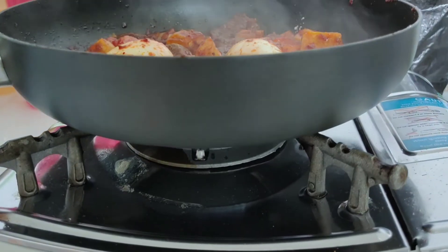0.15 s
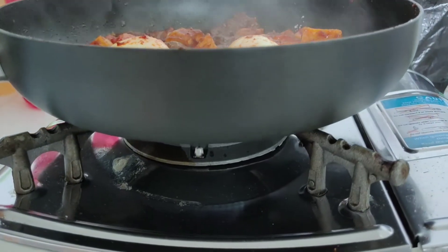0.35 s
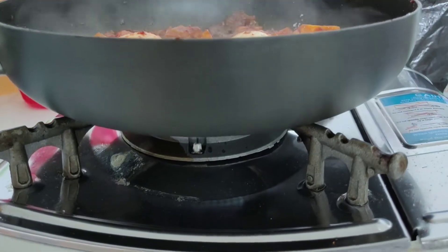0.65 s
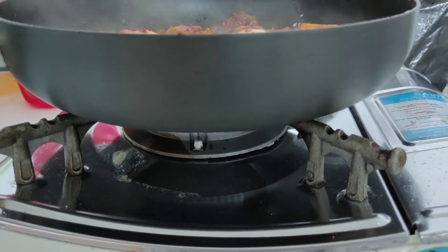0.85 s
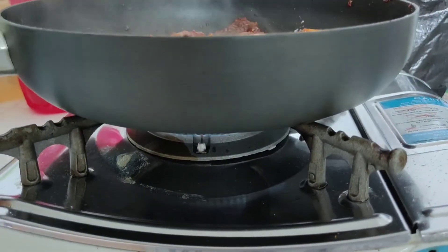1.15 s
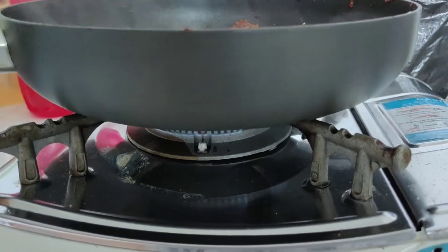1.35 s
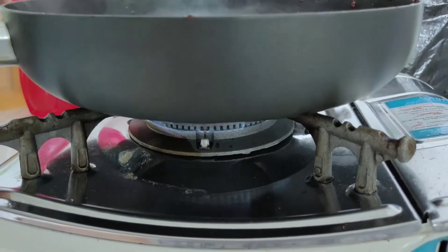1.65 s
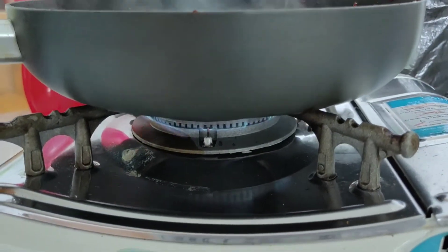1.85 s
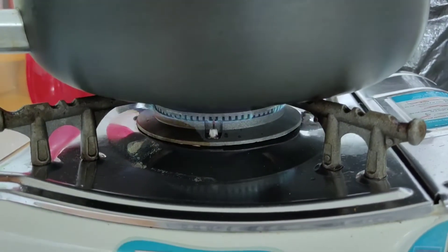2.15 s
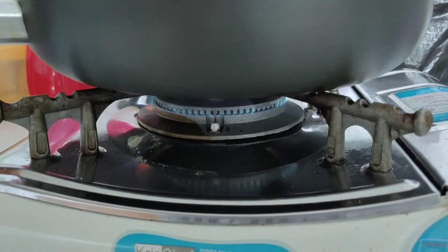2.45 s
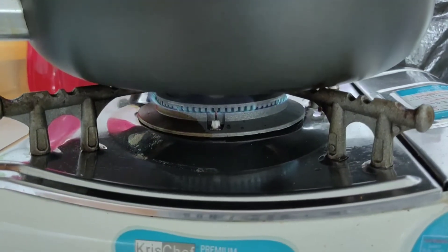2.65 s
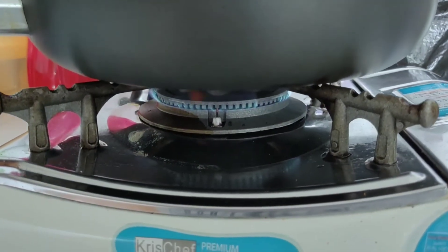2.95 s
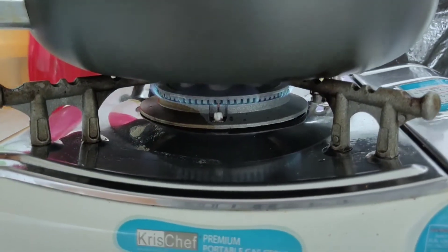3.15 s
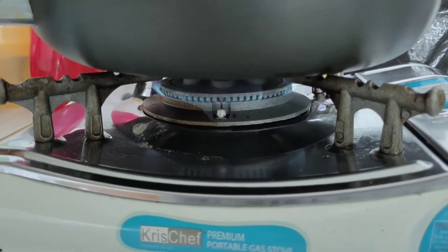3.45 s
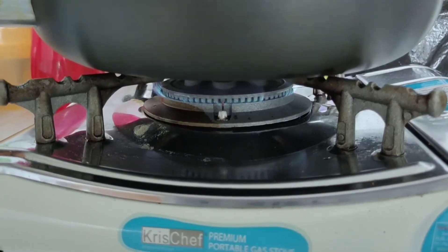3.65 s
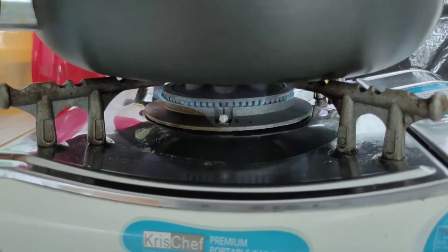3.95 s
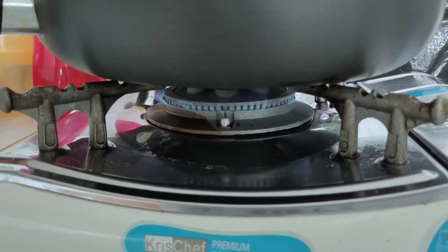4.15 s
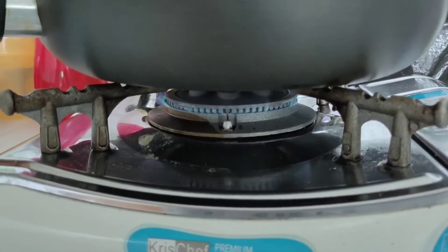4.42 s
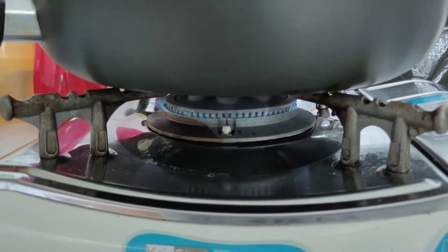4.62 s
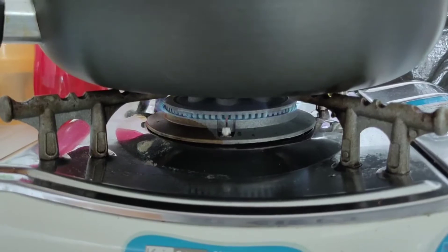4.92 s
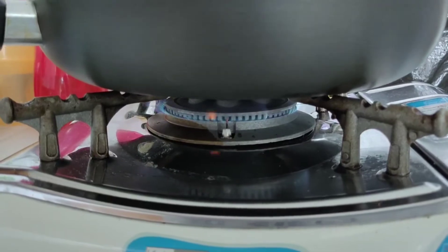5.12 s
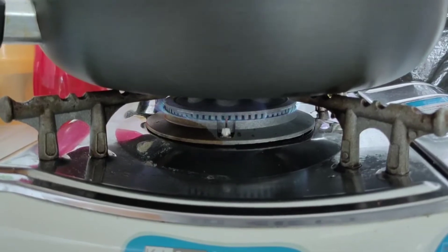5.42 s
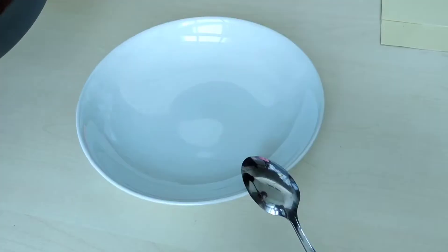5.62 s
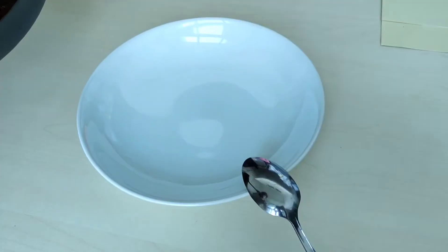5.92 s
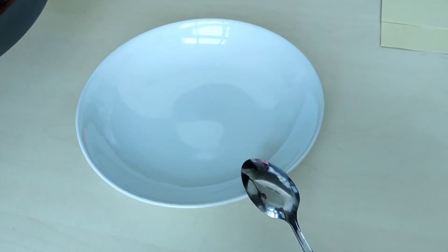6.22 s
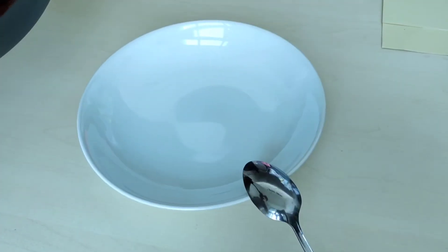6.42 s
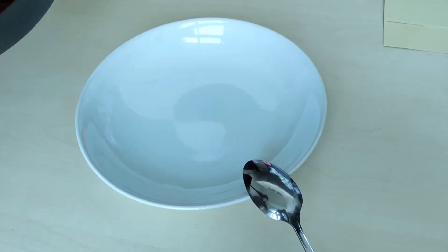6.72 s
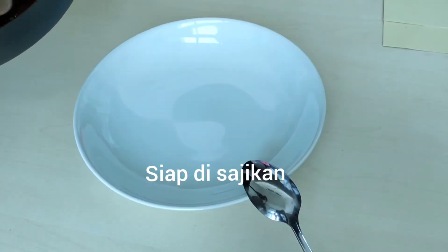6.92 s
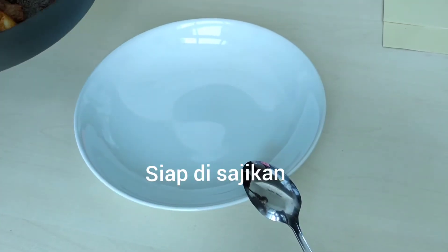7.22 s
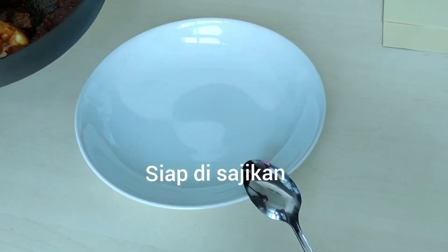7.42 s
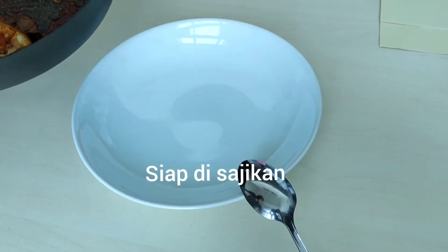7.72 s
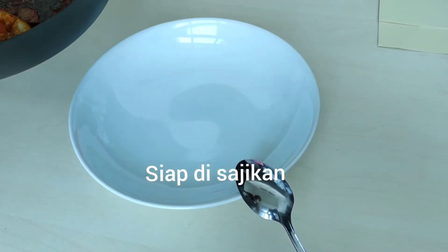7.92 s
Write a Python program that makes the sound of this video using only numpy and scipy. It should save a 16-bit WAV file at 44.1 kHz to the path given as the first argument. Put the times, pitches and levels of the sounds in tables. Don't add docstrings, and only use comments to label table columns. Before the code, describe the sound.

In a small kitchen, gas jets hiss brightly and evenly under a simmering pan, with fine crackle, occasional soft steam spits and a low rumbling extractor fan. It all cuts off suddenly into a brief silence. Then the room fades in quieter, with a more distant fan, and a hand shifts a pan and spoon: short metal scrapes, sleeve rustle, ringing ticks. Close stereo phone microphones.

```python
import sys
import numpy as np
from scipy import signal
from scipy.fft import rfft, irfft
from scipy.io import wavfile
from scipy.ndimage import uniform_filter1d

SR = 44100
rng = np.random.default_rng(int(sys.argv[2]) if len(sys.argv) > 2 else 0)


def linear_from_db(decibels):
    return 10 ** (np.asarray(decibels, float) / 20)


def digitize_waveform(pressure):
    field = np.atleast_2d(pressure).T
    bounded = np.clip(field, -1, 1)
    quanta = np.round(bounded * 32767).astype(np.int16)
    wavfile.write(sys.argv[1], SR, quanta)


N = 355887
TIME = np.arange(N) / SR
HZ = np.fft.rfftfreq(N + 513, 1 / SR) + 1
SIDES = np.array([[.5], [-.5]])
CUT_S, OPEN_S = 5.429, 5.62

# (frequency [Hz], likeness [0-1], left leads by [radians],
# left minus right [dB])
STOVE_MICS = [(60, 1, 0, 0), (130.6, 0.97, -0.17, -1), (220, 0.71, -0.15, -1.5), (348, 0.75, -0.0, -3),
              (536, 0.62, 0.5, -5), (770, 0.7, 0.96, -3), (1060, 0.6, 2.5, -2.5), (1355, 0.5, 3, 1.8),
              (1762, 0.02, 4.5, -1.5), (2300, 0.2, 0.3, -2), (3120, 0.5, 1, -5.5), (4220, 0.7, 1.2, 0),
              (5400, 0.2, -1.4, -7), (8230, 0.34, -5, -2)]


def unit(x):
    return x / np.sqrt(np.mean(x ** 2))


def over_time(table):
    return np.interp(TIME, *np.transpose(table))


def over_hz(table, column=1):
    table = np.transpose(table)
    return np.interp(np.log(HZ), np.log(table[0]), table[column])


def bumps(modes):
    power = sum(linear_from_db(db) ** 2 / (1 + (2 * (HZ - hz) / width) ** 2) for hz, width, db in modes)
    return np.sqrt(power)


def walk(rate):
    k = int(SR / rate)
    held = np.repeat(rng.standard_normal(N // k + 1), k)
    return 1.32 * uniform_filter1d(uniform_filter1d(held, k), k)[:N]


def grains(per_s, spread_db):
    hit = rng.random((2, N)) < per_s / SR
    size_db = spread_db * np.minimum(rng.exponential(size=(2, N)), 2.4)
    return hit * rng.standard_normal((2, N)) * linear_from_db(size_db)


def field(gain, mics, source, swell_db, flicker_db, rate):
    a, b = rfft(source, N + 513)
    c = np.clip(over_hz(mics), 0, .995) * np.exp(-1j * over_hz(mics, 2))
    pair = np.array([a, c * a + np.sqrt(1 - np.abs(c) ** 2) * b]) * linear_from_db(over_hz(mics, 3) * SIDES)
    pair = pair * gain / np.sqrt((1 + c.real) / 2)
    out, swell, octave = 0, walk(rate), np.log2(HZ / 20)
    for centre in np.arange(0, 10, .5):
        share = np.cos(np.pi * np.clip(octave - centre, -.5, .5)) ** 2
        if np.max(share * gain) > np.max(gain) / 1000:
            level_db = swell_db * swell + flicker_db * walk(2 * rate)
            out = out + irfft(pair * share)[:, :N] * linear_from_db(level_db)
    return out / np.sqrt(np.mean(out.mean(axis=0) ** 2))


def tone(hz, db, pan_db):
    wave = np.sin(2 * np.pi * (np.cumsum(hz + 0 * TIME) / SR + rng.random()))
    return np.sqrt(2) * wave * linear_from_db(db + 0.54 * walk(3.5) + pan_db * SIDES)


def puff(lo_hz, hi_hz, length):
    band = signal.butter(2, [lo_hz, min(hi_hz, 16000)], "band", fs=SR, output="sos")
    return unit(signal.sosfilt(band, rng.standard_normal((2, length))))


def add(out, s, burst, pan_db):
    i = int(s * SR)
    out[:, i:i + burst.shape[1]] += (burst * linear_from_db(pan_db * SIDES))[:, :N - i]


def fan():
    shaft_hz, mains_hz = 42.08, 50.035
    # (multiple of shaft speed, level [dB], left minus right [dB])
    shaft_tones = [(2, -39, 1.5), (4, -53.5, -5), (6, -61.5, -5.5), (18, -58.5, 9)]
    # (multiple of mains frequency, level [dB], left minus right [dB])
    mains_tones = [(2, -42, 2.5), (4, -68, 2)]
    # (frequency [Hz], level per Hz [dB])
    air_colour = [(15, -46), (25, -16.5), (61, -7.5), (88, -10), (110, -12), (140, -16), (220, -13.5),
                  (431, -10), (689, -13), (862, -14), (1120, -21.5), (1400, -27), (2200, -29.5),
                  (2860, -38), (4840, -120)]
    # (frequency [Hz], width [Hz], level over the air [dB])
    duct = [(162.6, 11.5, 10.5), (436, 22, 0.5), (877, 79, 1)]
    gain = linear_from_db(over_hz(air_colour)) * (1 + bumps(duct))
    noise = rng.standard_normal((2, N))
    air = field(gain, STOVE_MICS, noise, swell_db=-0.52, flicker_db=1.18, rate=9)
    tones = tone(3206.5, -62, -5)
    tones = tones + sum(tone(k * shaft_hz, db, pan) for k, db, pan in shaft_tones)
    tones = tones + sum(tone(k * mains_hz, db, pan) for k, db, pan in mains_tones)
    return air * linear_from_db(-37.5 - 0.16 * TIME) + tones


def creep(lack_db, tau_s):
    return lack_db * np.exp(-np.clip(TIME - OPEN_S, 0, None) / tau_s)


def room():
    # (frequency [Hz], likeness [0-1], left leads by [radians],
    # left minus right [dB])
    room_mics = [(61.4, 1, 0.2, 0), (129, 0.95, -0.5, -0.5), (220, 0.99, 0.5, 3), (362, 0.79, 0.5, -1.5),
                 (550, 0.29, 0.5, 1.5), (810, 0.2, 3, -2), (1076, 0.45, 1, -1), (1315, 0.72, 3.5, -1.5),
                 (1730, 0.23, 3.5, -8.5), (2250, 0.53, 0.5, -6.5), (3120, 0.08, -1.5, 2),
                 (4270, 0.76, -10, 9), (5500, 0.09, -0.5, -9), (8000, 0.52, -6, -3)]
    # (frequency [Hz], level per Hz [dB])
    room_colour = [(20, 2), (100, 8), (230, -6), (300, -2), (430, -8.5), (760, -8.5), (1100, -16),
                   (1350, -18), (1600, -19), (2150, -16.5), (3200, -26.5), (4600, -42.5), (6850, -51),
                   (7150, -63), (10000, -66), (15400, -68)]
    # (frequency [Hz], level against the bass [dB])
    far_hum = [(83.9, -6.5), (99.8, -7)]
    # (time [s], level [dB])
    drone = [
        (5.65, -64),
        (5.85, -55.5),
        (6.4, -57),
        (6.6, -54),
        (6.9, -61),
        (7.1, -45.5),
        (7.34, -50.5),
        (7.48, -43),
        (8.07, -44),
    ]
    room_db = -47 + creep(-14.5, 0.18)
    bass_db = -1.5 + creep(-18, 0.25)
    gain = linear_from_db(over_hz(room_colour))
    low = 1 / (1 + (HZ / 140) ** 6)
    args = dict(mics=room_mics, swell_db=-0.52, flicker_db=2.0, rate=4)
    air = field(gain * (1 - low), source=rng.standard_normal((2, N)), **args)
    lows = irfft(rfft(air, N + 513) / (1 + (HZ / 450) ** 6))[:, :N]
    air = air + lows * (linear_from_db(creep(-4, 0.11)) - 1)
    bass = field(gain * low, source=rng.standard_normal((2, N)), **args)
    bass = bass * linear_from_db(-3.0) + sum(tone(hz, db, 0) for hz, db in far_hum)
    hum = tone(170, over_time(drone) + 1.6 * walk(9), 0)
    return (air * linear_from_db(2.0) + bass * linear_from_db(bass_db)) * linear_from_db(room_db) + hum


def strokes():
    # (time of most pressure [s], length [s], scrape [dB], rustle [dB], sleeve hiss [dB])
    moves = [(5.794, 0.028, -45, -54.5, -73), (5.887, 0.029, -53, -53, -66), (5.955, 0.38, -51.5, -72, -86),
             (6.37, .025, -40.5, -51, -67), (6.42, 0.057, -45, -54, -71), (6.464, 0.032, -33, -54, -70),
             (6.494, 0.03, -44, -57, -79), (6.54, 0.045, -44.5, -59, -78), (6.653, 0.06, -52, -58.5, -73),
             (6.73, 0.24, -55.5, -64.5, -78), (7.158, 0.062, -50, -58, -72), (7.2, 0.1, -57, -60, -74),
             (7.403, 0.2, -67, -71.5, -84), (7.66, 0.042, -51, -59, -67), (7.698, .03, -54, -60, -75),
             (7.73, 0.055, -48.5, -56, -72), (7.773, .07, -65, -57.5, -69), (7.855, 0.018, -70, -69, -80),
             (7.95, .25, -76, -69.5, -92)]
    press_share, ease_db, pan_db, quick_s = 0.66, -8.5, 4, 0.079
    out = np.zeros((3, 2, N))
    for s, length, *db in moves:
        away = np.where(TIME < s, (s - TIME) / press_share, TIME - s) / length
        side = linear_from_db(2 * pan_db * np.clip(1 - length / quick_s, -1, 1) * SIDES)
        out += linear_from_db(2 * np.array(db))[:, None, None] * side * linear_from_db(2 * ease_db * away ** 1.2)
    return np.sqrt(out)


def slides():
    # (frequency [Hz], width [Hz], level [dB])
    pan_body = [(538, 49, -1), (873, 75, -7), (1230, 63, -9), (1770, 170, -8.5), (2045, 85, -2),
                (2400, 170, -5), (2635, 110, -3), (2980, 280, -11.5)]
    # (frequency [Hz], likeness [0-1], left leads by [radians], left minus right [dB])
    near = [(500, 0.29, 0.55, 4.0), (2200, 0.77, 1.0, -6.0), (4040, 0.23, .1, -4.5), (15000, 0.2, .1, 28)]
    # (frequency [Hz], width [Hz], level [dB])
    skin = [(4650, 600, 0.5), (5350, 700, -3), (3600, 900, -3.0), (6200, 640, -6), (7100, 500, -14),
            (8550, 400, -10)]
    cloth = [(10000, 4000, -1), (14000, 4000, -1)]
    press, rub, brush = strokes()
    metal = bumps(pan_body) / (1 + (HZ / 3600) ** 4)
    scrape = field(metal, near, grains(9000, 1.7), swell_db=1.5, flicker_db=-1.0, rate=38)
    rustle = field(bumps(skin) ** 2, near, grains(9000, 1.2), swell_db=1.2, flicker_db=2.2, rate=35)
    sleeve = field(bumps(cloth) ** 2, near, grains(12000, 2.2), swell_db=1.3, flicker_db=1.2, rate=25)
    return scrape * press.mean(axis=0) + rustle * rub + sleeve * brush


def arrive(t, hz, t60):
    late = np.clip(t - 0.2 / np.sqrt(hz), 0, None)
    return 2 * (1 - np.exp(-late / 0.00093)) * 1000 ** (-late / t60)


def ticks():
    # (time [s], ring [dB], # ring pitch
    # [Hz], crack [dB], left minus right [dB])
    metal_ticks = [(5.654, -53, 2260, -78, -2), (5.771, -51, 2170, -79, -3), (5.781, -39, 2190, -79, -2),
                   (5.786, -35.5, 2240, -74, 0), (5.791, -40, 2300, -79, -2), (5.797, -38, 2200, -76, -6),
                   (5.879, -42, 2160, -70, -3), (6.196, -48, 2200, -87, -11), (6.3521, -28.5, 2136, -46, 7),
                   (6.353, -46, 950, -79, 3), (6.361, -50, 2300, -62, 3), (6.4233, -44, 2067, -79, -2),
                   (6.448, -41, 2690, -79, 0), (6.4526, -34, 2100, -70, 0), (6.459, -35, 2300, -68, -3),
                   (6.4647, -35, 2400, -79, 1), (6.472, -34, 2090, -70, -2), (6.476, -38, 2000, -79, -3),
                   (6.5245, -39, 2050, -75, -5), (7.124, -47, 2010, -79, -4), (7.135, -42, 2030, -79, -4),
                   (7.144, -39.5, 2020, -68, 0), (7.150, -42, 2110, -79, -3), (7.608, -48, 1960, -70, 4),
                   (7.651, -34, 2570, -56, 1), (7.6515, -40, 1840, -62, -1), (7.677, -46, 1800, -79, -4),
                   (7.718, -46, 1850, -79, -4),
                   (5.786, -44, 3700, -79, 2), (5.796, -57, 4750, -79, 3), (5.873, -52, 4550, -74, 5),
                   (5.882, -47, 4660, -74, 5), (5.889, -44, 4600, -70, 5), (5.896, -51, 4500, -79, 5),
                   (5.897, -54, 6200, -67, 5), (6.351, -42, 5900, -79, 5), (6.353, -36, 4470, -79, 9),
                   (6.353, -43, 3170, -79, 3), (6.447, -57, 8400, -75, 3), (6.464, -55, 8200, -70, 3),
                   (6.469, -55, 8150, -79, 3), (6.478, -58, 8100, -79, 3), (6.534, -48, 4270, -79, 3),
                   (7.078, -55, 7000, -48, 15), (7.099, -58, 8000, -72, 10), (7.157, -52, 4740, -79, 2),
                   (7.186, -54, 5000, -79, 2), (7.19, -58, 8600, -66, 4), (7.268, -58, 7600, -66, 8),
                   (7.268, -62, 2900, -70, 3), (7.651, -51, 4800, -79, 3), (7.7403, -38, 4600, -72, 7),
                   (7.795, -49, 4450, -72, 2), (7.857, -64, 4520, -78, 6), (7.893, -53, 4570, -81, 2),
                   (7.94, -54, 4500, -81, 3)]
    # (frequency [Hz], width [Hz], level [dB])
    spoon = [(545, 120, -12), (2027, 150, 1), (3700, 150, -11), (4370, 210, -5), (5190, 120, -22),
             (5600, 140, -15), (8300, 120, -27)]
    crack_hz = 8360
    out, t = np.zeros((2, N)), TIME[:4000]
    for s, ring_db, hz, crack_db, pan_db in metal_ticks:
        thud_db = ring_db - 3 + 1.7 * min(ring_db + 29.5, 0)
        burst = linear_from_db(thud_db) * puff(1500, 6500, len(t)) * arrive(t, 4000, t60=0.014)
        wake_db = ring_db + 1.8 * min(ring_db + 27, 0)
        rings = [(hz, ring_db)] + [(f, wake_db + db) for f, width, db in spoon]
        for f, db in rings:
            turns = f * t + rng.random() + rng.random((2, 1)) / 5
            burst = burst + linear_from_db(db) * np.sin(2 * np.pi * turns) * arrive(t, f, t60=1.24 / np.sqrt(f))
        wide_db = -5 if hz < 3000 else -19
        crack = puff(crack_hz / 1.08, crack_hz * 1.03, len(t))
        crack = crack + linear_from_db(wide_db) * puff(5200, 15300, len(t))
        burst = burst + linear_from_db(crack_db) * crack * arrive(t, crack_hz, t60=0.017)
        add(out, s - .0036, burst, pan_db)
    return out


def spits():
    # (time [s], peak [dB], centre [Hz], treble minus peak [dB], left minus right [dB])
    bubbles = [(0.4498, -33, 4690, -23, -4.5), (0.701, -31.5, 4170, -23, -2), (1.0809, -40, 4480, -25, -9),
               (1.1887, -33.5, 5130, -30, -5), (1.3573, -33, 4400, -13, -3), (1.629, -47, 5130, 6, -5.0),
               (2.42, -36, 4550, -26, -2), (2.6997, -42, 4770, 2, -2), (2.76, -36, 4800, -19, -7),
               (2.925, -38, 3000, -19, 3), (2.947, -37.5, 4560, -15, -6), (3.3606, -42, 5400, -20, -3),
               (3.5994, -44, 4200, -7, -2), (3.8702, -33.5, 2100, -11, -3), (4.07, -38, 4400, -7, -4),
               (4.138, -35, 4300, -12, -2), (4.47, -39, 4600, -5.5, -3), (4.568, -38, 4880, -18.5, 3),
               (4.8015, -44, 4555, -15, 0), (4.9308, -35, 4640, 4, -3), (5.193, -34, 4370, -5.5, -6),
               (5.2194, -45, 4620, -9, -1.5), (5.2996, -38, 4480, -9.5, -2), (5.28, -48, 5000, 4, 0)]
    out, t = np.zeros((2, N)), TIME[:3000]
    shape = ((t / 0.0047) * np.exp(1 - t / 0.012)) ** 2
    for s, db, hz, treble_db, pan_db in bubbles:
        steam = puff(hz / 1.25, hz * 1.51, len(t)) + linear_from_db(treble_db) * puff(4400, 10000, len(t))
        add(out, s - .004, steam * shape * linear_from_db(db - 16), pan_db)
    return out


def burner():
    # (frequency [Hz], level per Hz [dB])
    gas_colour = [(760, -37.5), (1300, -11.5), (1650, -7.5), (2040, -2.5), (3090, -4), (3710, -6.5),
                  (4590, 1.5), (6370, -10), (7140, -9), (8000, -22), (10400, -26.5), (17600, -120)]
    # (frequency [Hz], level per Hz [dB])
    sizzle_colour = [(4200, -31), (7000, -2.5), (7900, -6), (9300, -9), (9900, -10.5), (10500, -10),
                     (11050, -10.5), (11400, -11.5), (12000, -10.5), (12500, -11), (14000, -10),
                     (15500, -11.5)]
    # (frequency [Hz], width [Hz], share cancelled at first [0-1], share at last [0-1])
    shadows = [(9700, 500, .4, -.1), (10400, 350, .35, .1), (10900, 300, .4, .3), (11450, 250, .2, .15),
               (12600, 600, .25, .1), (14000, 900, 0, .25)]
    # (time [s], level of the finest crackle [dB])
    simmer = [(0.0, -49), (0.29, -52.5), (0.38, -50), (1.98, -54.5), (2.69, -53), (2.72, -49),
              (2.79, -54.5), (4.45, -51.5), (4.92, -54.5), (4.94, -49), (5.12, -57), (5.21, -51.5),
              (5.25, -60), (5.28, -50), (5.37, -56.5), (5.42, -49)]
    mix = rng.standard_normal((2, N)) + 0.72 * unit(grains(2500, 2.6))
    gas = field(linear_from_db(over_hz(gas_colour)), STOVE_MICS, mix, swell_db=0.5, flicker_db=.75, rate=12)
    mix = rng.standard_normal((2, N)) + 0.7 * unit(grains(1500, 1.6))
    top = field(linear_from_db(over_hz(sizzle_colour)), STOVE_MICS, mix, swell_db=.4, flicker_db=1, rate=14)
    for hz, width, start, end in shadows:
        depth = np.clip(start + (end - start) * TIME / CUT_S + .13 * walk(26), 0, .8)
        band = irfft(rfft(top, N + 513) * np.exp(-((HZ - hz) / width) ** 2))[:, :N]
        top = top - depth * band
    high = irfft(rfft(top, N + 513) / (1 + (10870 / HZ) ** 30))[:, :N]
    fine = high * linear_from_db(over_time(simmer) + 8.5)
    gas_db = -35.5 - 3.5 * (1 - np.exp(-TIME / 1.34))
    coarse_db = -7.5 - 0.07 * TIME
    pan_db = -1.5 + 0.28 * TIME
    hiss = (gas * linear_from_db(0.7) + (top - high) * linear_from_db(coarse_db)) * linear_from_db(gas_db)
    return (hiss + fine) * linear_from_db(pan_db * SIDES)


def scene():
    stove = fan() + spits() + burner()
    ending = np.exp(-np.clip(TIME - CUT_S, 0, None) / 0.0011)
    stove = stove * ending * np.where(TIME > CUT_S, .15, 1)
    add(stove, CUT_S - .003, linear_from_db(-40.5) * puff(5000, 15500, length=110) * np.hanning(110), 0)
    fade = np.clip((TIME - OPEN_S) / 0.031, 0, 1) ** 1.3
    mic_hiss = linear_from_db(-92.0) * puff(9000, 16000, N)
    return stove + fade * (room() + slides() + mic_hiss) + ticks()


def roll_off(x):
    return signal.sosfilt(signal.butter(12, 15680, fs=SR, output="sos"), x)


def record(dry):
    top_limits = [15620, 15450, 15250, 15250, 15100, 14900]
    hole_db, gap_db = -3.4, -4.2
    hz, t, z = signal.stft(dry, SR, nperseg=2048)
    power = np.mean(np.abs(z) ** 2, axis=0) + 1e-24
    local = uniform_filter1d(uniform_filter1d(power, size=4, axis=0), size=2, axis=1)
    local_db = 10 * np.log10(local)
    treble = (hz > 7000) & (hz < 15000)
    keep = (local_db > local_db[treble].mean(axis=0) + hole_db) | ~treble[:, None]
    keep &= (local_db > uniform_filter1d(local_db, size=70, axis=0) + gap_db) | (hz[:, None] < 1000)
    top_hz = np.repeat(rng.choice(top_limits, len(t)), 3)[:len(t)]
    top_hz = np.where(t < 1.8, np.maximum(top_hz, 15500), top_hz)
    kept = z * keep * (hz[:, None] < top_hz)
    heard = signal.istft(kept, SR, nperseg=2048)[1][:, :N]
    silence = (TIME > CUT_S + .003) & (TIME < OPEN_S)
    return roll_off(heard * ~silence)


dry = scene()
out = record(dry)
digitize_waveform(out)
```